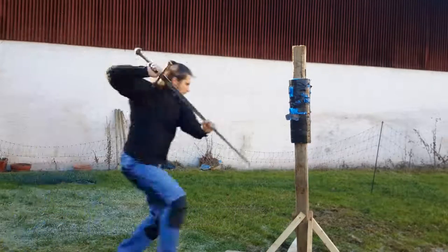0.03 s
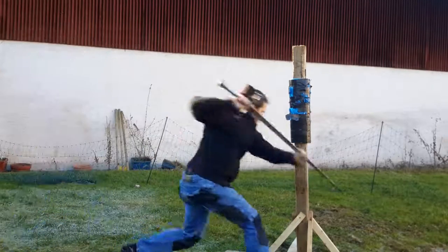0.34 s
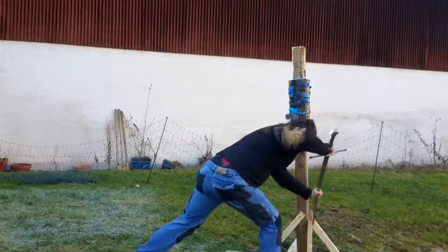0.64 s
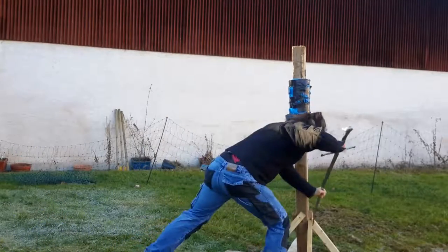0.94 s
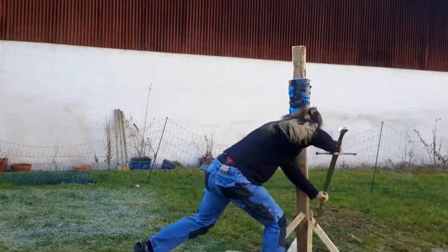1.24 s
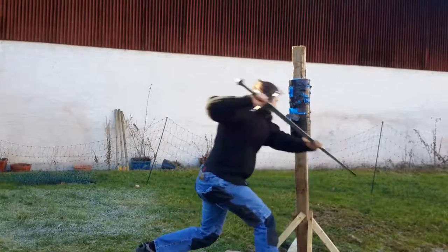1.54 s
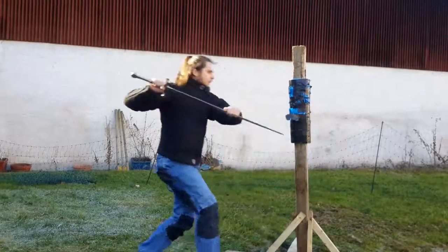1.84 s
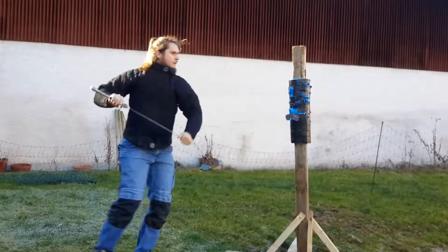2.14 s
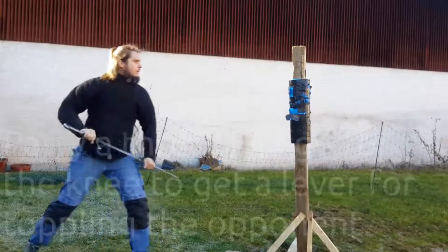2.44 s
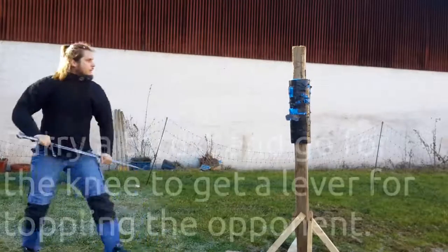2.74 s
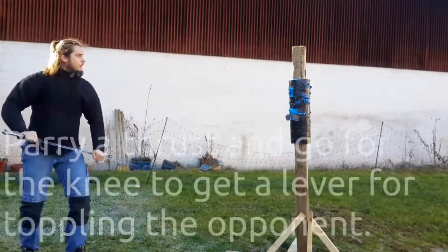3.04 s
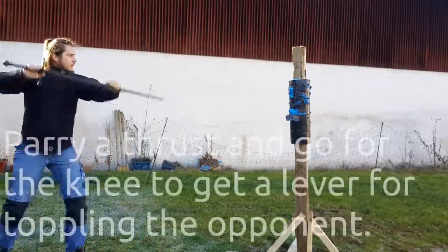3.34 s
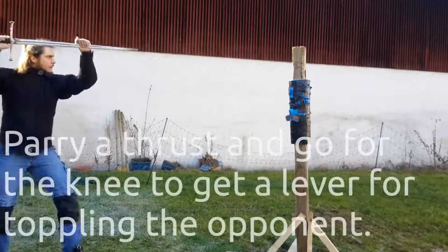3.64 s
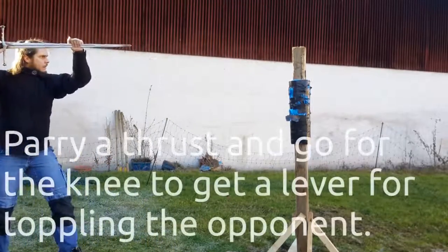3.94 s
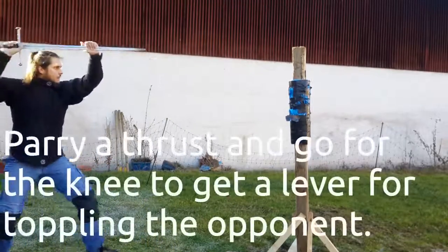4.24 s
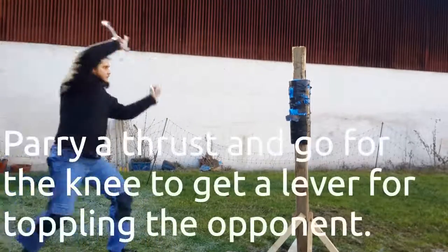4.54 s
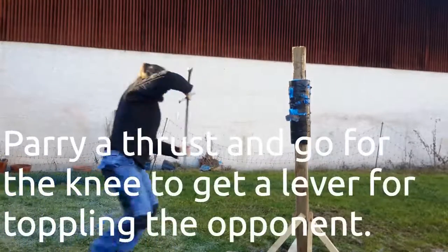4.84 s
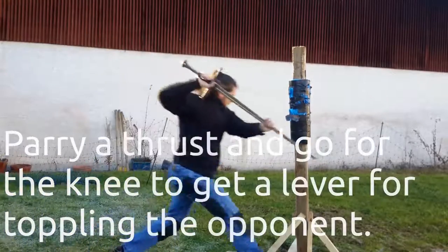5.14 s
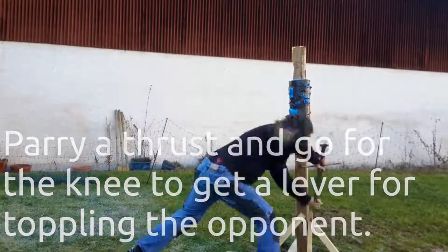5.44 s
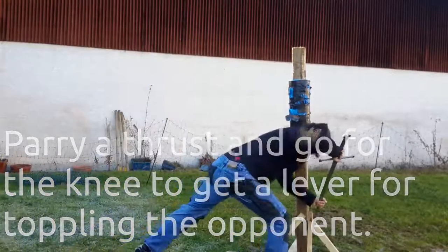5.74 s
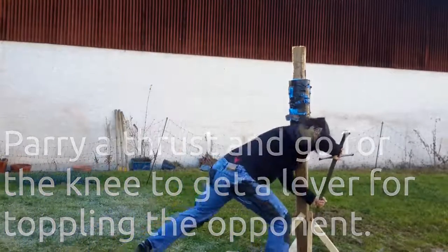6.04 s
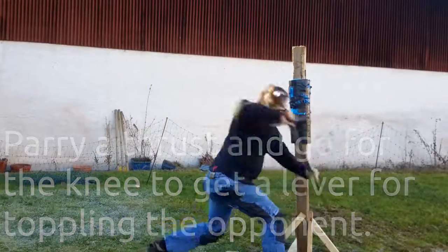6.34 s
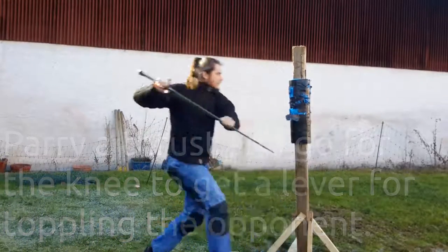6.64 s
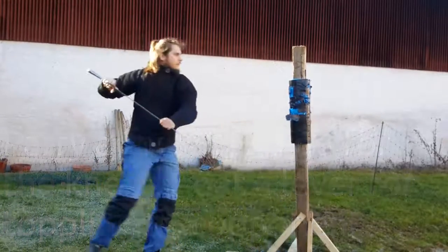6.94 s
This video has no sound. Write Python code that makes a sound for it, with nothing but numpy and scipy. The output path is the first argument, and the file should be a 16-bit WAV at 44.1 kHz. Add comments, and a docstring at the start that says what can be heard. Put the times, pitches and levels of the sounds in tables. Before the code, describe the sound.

On a lawn in a walled yard, a steel sword strikes a wooden post twice, about five seconds apart. Each loud, cracking knock shakes the wooden stand and returns from the buildings as a brief ringing tail. Between the blows the microphone picks up soft footfalls, a little cloth rustle, three faint chirps and two thin whistles from a farther bird. Distant traffic and engines drone very quietly throughout.

```python
"""A steel training sword strikes a wooden post twice on a lawn in a walled yard.
Post and blade ring, fibres crack, the edge skids and the stand shudders. Each knock slaps back
from the wall, then returns from farther buildings as a bright, ringing tail.
Clothes and grass rustle and shoes thud between the blows.
Distant traffic and two engines drone; one small bird chirps, a farther one whistles."""
import sys
import numpy as np
from scipy import signal
from scipy.fft import rfft, irfft, next_fast_len
from scipy.io import wavfile

SR = 44100
rng = np.random.default_rng(int(sys.argv[2]) if len(sys.argv) > 2 else 0)


def output_pcm(signal):
    """Save a mono or channel-first signal as 16-bit PCM at the path in sys.argv[1].

    Samples are clipped to [-1, 1] before scaling.
    """
    pcm = np.clip(np.atleast_2d(signal).T, -1, 1) * 32767
    wavfile.write(sys.argv[1], SR, np.round(pcm).astype(np.int16))


N = 312551
TIME = np.arange(N) / SR
WALL_DELAY_S = .0315

# Spectra of the near scatter, one per blow. Each point: frequency in Hz, density in dB.
NEAR_SPECTRA = [
    [(35, -51), (60, -13), (113, -1), (230, -18.5), (531, 1), (996, -23), (1080, 1), (1230, -3), (1310, -6),
     (2610, -6.5), (2840, -2), (3220, -25), (4700, -8.5), (6570, -21), (9000, -53)],
    [(35, -42), (60, -36), (239, -8), (372, -2), (468, -9), (669, 2), (791, -37), (878, -30), (1020, -11),
     (1950, -1), (2400, -6), (2670, -6), (3650, -7), (4900, -6), (9000, -42.5)],
]
# Spectra of the far returns, one per blow. Each point: frequency in Hz, density in dB.
FAR_SPECTRA = [
    [(200, -14), (436, -4.5), (528, -5), (581, -6), (923, -0.5), (1050, 5.5), (1400, -2.5), (1660, 5),
     (1950, -1.5), (2950, -3), (3200, -13), (4800, -3), (5700, -14), (9000, -45)],
    [(200, -13.5), (554, -3.5), (610, 0), (738, -5), (1190, -3), (1310, -0.5), (1740, 4), (2730, -1.5),
     (4500, 1), (6240, -13), (6540, -22), (8050, -22.5), (9000, -52)],
]


def from_db(db):
    """Decibels to gain."""
    return 10 ** (np.asarray(db) / 20)


def unit_rms(x):
    """Scale to unit power."""
    return x / np.sqrt(np.mean(x ** 2) + 1e-20)


def add(track, start_s, sound):
    """Mix a sound into a track."""
    start = round(start_s * SR)
    track[start:start + len(sound)] += sound[:len(track) - start]


def cut(x, kind, hz, order=2):
    """Causal Butterworth filter."""
    return signal.sosfilt(signal.butter(order, hz, kind, fs=SR, output="sos"), x + 1e-18)


def cut_zero_phase(x, kind, hz, order=2):
    """Butterworth filter run forward and back."""
    return signal.sosfiltfilt(signal.butter(order, hz, kind, fs=SR, output="sos"), x)


def band_noise(size, band_hz, order=2):
    """Unit-power noise in a band."""
    return unit_rms(cut(rng.standard_normal(size), "band", band_hz, order))


def drift(size, rate_hz):
    """Unit-power random wander."""
    return unit_rms(cut(rng.standard_normal(size), "low", rate_hz))


def shaped_noise(spectrum, size, resonances=()):
    """Unit-power noise with a given spectrum plus resonances; falls 30 dB per octave past its ends."""
    padded = next_fast_len(size, real=True)
    hz = np.maximum(np.fft.rfftfreq(padded, 1 / SR), 1)
    points_hz, levels_db = np.transpose(spectrum)
    octaves_outside = np.abs(np.log2(hz / np.clip(hz, points_hz[0], points_hz[-1])))
    db = np.interp(np.log(hz), np.log(points_hz), levels_db) - 30 * octaves_outside
    for centre_hz, width_hz, lift_db in resonances:
        db += lift_db / (1 + (2 * (hz - centre_hz) / width_hz) ** 2)
    white = rfft(rng.standard_normal(padded))
    return unit_rms(irfft(white * from_db(db), padded)[:size])


def decay(age, t60_s, rise_s):
    """Envelope that rises from age 0 and dies exponentially."""
    age = np.maximum(age, 0)
    return (1 - np.exp(-age / rise_s)) * 1000 ** (-age / t60_s)


def burst(envelope, grain):
    """Noise under an envelope, scaled to the envelope's energy."""
    return envelope * grain * np.linalg.norm(envelope) / np.linalg.norm(envelope * grain)


def traffic(split_hz=1400, spreading=1.045, whine_ratio=1.096):
    """Distant road: rumble, roar, tyre hiss and tread whine swell as each vehicle nears."""
    # Vehicles. Each row: nearest moment in seconds, half-width in seconds, roar, rumble and
    # tyre hiss in dB, whine pitch in Hz, whine level in dB.
    passes = [(1.4, 0.55, -59.5, -60, -67, 1180, -67.5), (3.1, 0.62, -57, -58.5, -65.5, 1796, -67.5),
              (4.1, 0.21, -72, -97, -86, 735, -64.5), (4.8, 0.73, -57, -59.5, -65.5, 786, -70),
              (6.95, 1, -64.5, -64.5, -66.5, 760, -76)]
    # Road spectra. Each point: frequency in Hz, density in dB.
    roar_spectrum = [(210, -28.5), (350, -4), (433, -9.5), (647, -1), (942, -2), (1620, -4.5), (1900, -5.5),
                     (2350, -6), (3740, -10.5), (4400, -8.5), (7000, -20), (9100, -62)]
    rumble_spectrum = [(16, -61), (28, -29), (46, -5), (60, -8.5), (92, -2), (215, -4), (254, -5),
                       (453, -9), (600, -9), (780, -19)]
    power = from_db([[-74], [-77.5], [-78]]) ** 2  # steady roar, rumble, tyre hiss
    whine = np.zeros(N)
    for nearest_s, half_width_s, *levels_db, whine_hz, whine_db in passes:
        nearness = (1 + ((TIME - nearest_s) / half_width_s) ** 2) ** -spreading
        power = power + np.outer(from_db(levels_db) ** 2, nearness)
        tread = band_noise(N, [whine_hz / whine_ratio, whine_hz * whine_ratio])
        whine += from_db(whine_db) * np.sqrt(nearness) * tread
    roar_gain, rumble_gain, tyre_gain = np.sqrt(power)
    rumble = rumble_gain * shaped_noise(rumble_spectrum, N)
    roar = roar_gain * unit_rms(cut(shaped_noise(roar_spectrum, N), "low", split_hz, order=4))
    tyres = tyre_gain * unit_rms(cut(shaped_noise(roar_spectrum, N), "high", split_hz, order=4))
    return rumble + roar + tyres + whine


def swells(rows, edge_s):
    """Gain that rises, holds and falls once per row."""
    gain = np.zeros(N)
    for start_s, length_s, db in rows:
        age = TIME - start_s
        gain += from_db(db) * (np.tanh(age / edge_s) - np.tanh((age - length_s) / edge_s)) / 2
    return gain


def hum(hz, wander_hz, throb_db):
    """Low engine note, wavering in pitch and level."""
    pitch_hz = hz + wander_hz * drift(N, rate_hz=9.1)
    throb = from_db(throb_db * drift(N, rate_hz=6.5))
    return throb * unit_rms(np.sin(2 * np.pi * np.cumsum(pitch_hz) / SR))


def engines(idle_hz=69.8, idle_floor_db=-70.5, climb_hz_per_s=9.8):
    """One far engine idles while another gathers speed."""
    # Swells of each engine. Each row: start in seconds, length in seconds, level in dB.
    idle_swells = [(.72, 1.4, -63), (2.35, 1.03, -61.5), (2.7, 0.23, -59)]
    climb_swells = [(4.03, 0.36, -63), (5.2, 0.94, -64)]
    idle_gain = from_db(idle_floor_db) + swells(idle_swells, edge_s=.017)
    idling = idle_gain * hum(idle_hz, wander_hz=4.2, throb_db=1.3)
    climb_hz = 130 + climb_hz_per_s * (TIME - 4.6)
    climbing = swells(climb_swells, edge_s=.071) * hum(climb_hz, wander_hz=3.3, throb_db=3.5)
    return idling + climbing


def movement(step_band_hz=(110, 600), step_t60_s=.28, crumple_db=2, crumple_hz=40):
    """Shoes thud softly on turf; cloth and grass swish."""
    # Footfalls. Each row: start in seconds, level in dB, sole roll-down time in seconds.
    steps = [(0.461, -51.5, 0.0032), (1.9, -36, 0.11), (2.06, -56, 0.006), (2.55, -44, 0.04),
             (4.68, -36, 0.11), (4.73, -53.5, .004), (4.776, -63, .002), (5.33, -52, 0.0041),
             (5.368, -51.5, 0.0023), (6.72, -58, 0.0092)]
    # Swishes. Each row: centre in seconds, level in dB, Gaussian width in seconds.
    rustles = [(0.48, -70.5, 0.088), (1.992, -64, 0.098), (4.73, -69, 0.04), (5.233, -66.5, 0.78),
               (6.78, -75, 0.068)]
    # Cloth and grass spectrum. Each point: frequency in Hz, density in dB.
    rustle_spectrum = [(1500, -6), (3000, -5), (4100, -9), (4500, -5.5), (5100, 1.5), (5600, -2.5),
                       (6400, -28), (8000, -13)]
    weight = sum(from_db(db) * decay(TIME - start_s, step_t60_s, roll_s) for start_s, db, roll_s in steps)
    turf = cut(band_noise(N, step_band_hz, order=1), "low", 1300)
    swish = sum(from_db(db) * np.exp(-((TIME - centre_s) / width_s) ** 2 / 2)
                for centre_s, db, width_s in rustles)
    crumple = from_db(crumple_db * drift(N, crumple_hz))
    return weight * turf + swish * crumple * shaped_noise(rustle_spectrum, N)


def knock(blow, age, lag_s=.00047, travel_1khz_s=.00056, ground_delay_s=.00377, ground_gain=.49):
    """Bending waves run faster at high pitch, so treble modes start first; the ground reflects the knock."""
    # Modes of post and blade, weighted by the contact point. Each row: frequency in Hz,
    # t60 in seconds, level in dB for each blow.
    modes = [(112, .17, -36, -55), (195, .2, -44, -40), (300, .11, -42, -41), (388, .137, -20, -19.5),
             (437, .095, -21.5, -23), (520, .13, -31.5, -25), (665, .099, -21.5, -18.5),
             (773, .053, -29, -29), (973, .06, -17.5, -22.5), (1126, .026, -10.5, -19.5),
             (1270, .028, -14, -10.5), (1437, .022, -24.5, -17), (1686, .015, -23, -12.5),
             (1846, .017, -18, -14.5), (2303, .045, -20, -16), (2490, .05, -32.5, -25),
             (2831, .018, -16, -15), (4277, .009, -17, -4.5), (5530, .05, -38, -35)]
    direct = np.zeros(len(age))
    for k, (hz, t60_s, *levels_db) in enumerate(modes):
        since = age - lag_s - travel_1khz_s * np.sqrt(1000 / hz)
        envelope = from_db(levels_db[blow]) * decay(since, t60_s, rise_s=.00093)
        direct += (-1) ** k * envelope * np.sin(2 * np.pi * hz * since)
    return direct + ground_gain * np.interp(age - ground_delay_s, age, direct, left=0)


def crack(blow, age, t60_s, peak_s=.0028):
    """Wood fibres splinter as the edge bites: a bright burst."""
    # Splinter spectra, one per blow. Each point: frequency in Hz, density in dB.
    spectra = [
        [(2400, 0), (2900, -10), (3340, -11), (3900, -7), (4500, 0), (5700, -1), (6300, -30), (9150, -26),
         (11000, -42)],
        [(2400, 2), (3100, -12), (3650, -5), (4230, -3), (5000, -6), (5650, 0), (6100, -13), (7300, -20),
         (9000, -26), (11000, -65)],
    ]
    bite = np.minimum(age / peak_s, 1) * 1000 ** (-np.maximum(age - peak_s, 0) / t60_s)
    return burst(bite, shaped_noise(spectra[blow], len(age)))


def skid(blow, age, band_hz=(3900, 5600)):
    """The edge skids on the wood and catches again."""
    # Catches. Each row: delay in seconds, level in dB for each blow, t60 in seconds.
    catches = [(0.0132, -28.5, -34, 0.038), (0.0202, -44.5, -30, 0.043)]
    grit = band_noise(len(age), band_hz, order=3)
    return sum(from_db(levels_db[blow]) * burst(decay(age - delay_s, t60_s, rise_s=.0016), grit)
               for delay_s, *levels_db, t60_s in catches)


def stand_rattle(blow, age, band_hz=(330, 1050), delay_s=.0152, buzz_db=-13):
    """The post tips against its wooden stand: hollow clatter with a little bright buzz."""
    hollow = band_noise(len(age), band_hz, order=3)
    buzz = from_db(buzz_db) * shaped_noise(NEAR_SPECTRA[blow], len(age))
    return burst(decay(age - delay_s, t60_s=.26, rise_s=.0024), hollow + buzz)


def sway(age):
    """The shaken post and stand rumble on the ground."""
    return decay(age, t60_s=2.15, rise_s=.19) * band_noise(len(age), band_hz=(56, 135))


def wall_slap(blow, age, clang_hz=1810, clang_t60_s=.018, rise_s=.001):
    """The nearest wall returns the crack with the blade's clang on top."""
    # Wall returns, one per blow. Each row: slap in dB, clang in dB, slap t60 in seconds.
    returns = [(-22.5, -13.5, .026), (-17, -6, .033)]
    # Slap spectrum. Each point: frequency in Hz, density in dB.
    spectrum = [(300, -8), (480, -17), (1000, -16), (1500, 13), (2050, -16), (2500, -7), (2880, 8),
                (3300, -4), (4100, -4), (4650, 4), (5250, 3), (5700, -17), (6500, -24), (9000, -48)]
    slap_db, clang_db, t60_s = returns[blow]
    since = age - WALL_DELAY_S
    slap = burst(decay(since, t60_s, rise_s), shaped_noise(spectrum, len(age)))
    clang = decay(since, clang_t60_s, rise_s) * np.sin(2 * np.pi * clang_hz * since)
    return from_db(slap_db) * slap + from_db(clang_db) * clang


def near_scatter(blow, age):
    """Wall, fence and ground scatter the knock right after the slap."""
    envelope = decay(age - WALL_DELAY_S, t60_s=.22, rise_s=.0017)
    return envelope * shaped_noise(NEAR_SPECTRA[blow], len(age))


def echoes(blow, age, lift_db=8, width_ratio=.47, highpass_hz=950, lowpass_hz=8000):
    """Fence and buildings return the clack, each favouring a band; longer echoes start more softly."""
    # Reflections. Each row: delay in seconds, level in dB for each blow, t60 in seconds,
    # favoured frequency in Hz.
    reflections = [(.0398, -35, -26, .04, 4900), (.047, -33, -28, .02, 2400), (.058, -35, -42, .025, 4500),
                   (.071, -38, -31, .035, 2800), (.128, -42, -39, .07, 4900),
                   (.1419, -24.5, -19, .022, 5000), (.157, -39, -52, .1, 4900),
                   (.1712, -42, -23, .03, 4200), (.1803, -26.5, -19.5, .032, 1450),
                   (.195, -39, -40, .07, 5000), (.216, -35, -42, .04, 1700), (.255, -43, -38, .05, 1800),
                   (.293, -44, -40, .03, 1700), (.335, -40, -37, .07, 2200), (.403, -43, -50, .05, 1600),
                   (.4345, -47, -56, .06, 1600)]
    out = np.zeros(len(age))
    for delay_s, *levels_db, t60_s, hz in reflections:
        grain = shaped_noise(FAR_SPECTRA[blow], len(age), [(hz, width_ratio * hz, lift_db)])
        envelope = decay(age - delay_s, t60_s, rise_s=.022 * t60_s)
        out += from_db(levels_db[blow]) * burst(envelope, cut(grain, "high", highpass_hz))
    return cut(out, "low", lowpass_hz, order=4)


def far_tail(blow, age, crest_s=.17, crest_width_s=.033, crest_db=4):
    """Far echoes arrive in clumps, crest and fade; air takes the treble first, the bass lingers."""
    # Blade resonances. Each row: frequency in Hz, width in Hz, lift in dB for each blow.
    blade = [(1043, 14, 6, 1), (1830, 120, 0, 4), (1890, 62, -8, 5.5), (2580, 72, -9, 3), (2860, 58, 4, 4),
             (3480, 59, -1, 6), (3870, 320, 8.5, -2), (4080, 330, -16, -0.5), (4450, 76, -16, -11),
             (4530, 99, 4, -1)]
    swell_db_per_s, fall_db_per_s, air_db_per_s, linger_db_per_s = 110, 55, 16, 13
    resonances = [(hz, width_hz, lifts_db[blow]) for hz, width_hz, *lifts_db in blade]
    ring = shaped_noise(FAR_SPECTRA[blow], len(age), resonances)
    since_crest = age - crest_s
    early, late = np.maximum(-since_crest, 0), np.maximum(since_crest, 0)
    peak_db = crest_db * (np.exp(-(since_crest / crest_width_s) ** 2) - 1)
    clumps_db = 1.7 * drift(len(age), rate_hz=60)
    envelope = from_db(peak_db + clumps_db - swell_db_per_s * early - fall_db_per_s * late)
    fade_in = np.minimum(2 * age / crest_s, 1)
    dull = cut_zero_phase(ring, "low", 3200)
    bass = cut_zero_phase(ring, "low", 550)
    middle = dull - bass
    treble = (ring - dull) * from_db(-air_db_per_s * since_crest)
    return fade_in * envelope * (bass * from_db(linger_db_per_s * late) + middle + treble)


def sword(length_s=1.5):
    """Two blows on the post, each with the yard's answer."""
    # Blows. Each row: start in seconds, knock and crack in dB, crack t60 in seconds,
    # then stand rattle, sway, near scatter and far tail in dB.
    blows = [(.6594, -0.5, -29, 0.05, -28.5, -49.5, -27, -34.5),
             (5.5627, 0, -21, 0.036, -27, -45.5, -22.5, -29.5)]
    out = np.zeros(N)
    age = np.arange(round(length_s * SR)) / SR
    for blow, row in enumerate(blows):
        start_s, knock_db, crack_db, crack_t60_s, stand_db, sway_db, near_db, far_db = row
        hit = from_db(knock_db) * knock(blow, age)
        edge = from_db(crack_db) * crack(blow, age, crack_t60_s) + skid(blow, age)
        shudder = from_db(stand_db) * stand_rattle(blow, age) + from_db(sway_db) * sway(age)
        returns = wall_slap(blow, age) + echoes(blow, age)
        scatter = from_db(near_db) * near_scatter(blow, age) + from_db(far_db) * far_tail(blow, age)
        add(out, start_s, hit + edge + shudder + returns + scatter)
    return out


def bird_chirps(scoop_s=.019, hook_s=.006, waver_hz=50, rasp_depth=.42, wall_db=-12):
    """Chirps scoop up and hook down, sweeping harmonics through the throat resonance; the wall echoes."""
    # Chirps, pitched at the sixth harmonic. Each row: start and length in seconds,
    # top, opening scoop and closing hook in Hz, level in dB.
    chirps = [(2.587, .038, 5350, 1200, 300, -62), (2.674, .08, 5230, 1450, 750, -58.7),
              (2.882, .097, 5260, 850, 250, -59)]
    throat_hz, throat_width_hz = 5130, 380
    out = np.zeros(N)
    for start_s, length_s, top_hz, scoop_hz, hook_hz, db in chirps:
        age = np.arange(round(length_s * SR)) / SR
        glide_hz = top_hz - scoop_hz * np.exp(-age / scoop_s) - hook_hz * np.exp((age - length_s) / hook_s)
        pitch_hz = (glide_hz + waver_hz * drift(len(age), rate_hz=140)) / 6
        phase = 2 * np.pi * np.cumsum(pitch_hz) / SR
        voice = np.zeros(len(age))
        for k in range(5, 10):
            throat = 1 / np.hypot(1, 2 * (k * pitch_hz - throat_hz) / throat_width_hz)
            rasp = unit_rms(1 + rasp_depth * drift(len(age), rate_hz=400))
            voice += throat * rasp * np.sin(k * phase)
        chirp = from_db(db) * np.sqrt(np.sin(np.pi * age / length_s)) * voice
        add(out, start_s, chirp)
        add(out, start_s + WALL_DELAY_S, from_db(wall_db) * chirp)
    return out


def bird_whistles(waver_hz=20, flutter_db=2.5, rate_hz=50):
    """A farther bird holds thin, level notes with slight flutter."""
    # Notes. Each row: start and length in seconds, pitch in Hz, level in dB.
    notes = [(3.272, .118, 4320, -67.5), (3.555, .04, 4300, -69)]
    out = np.zeros(N)
    for start_s, length_s, hz, db in notes:
        size = round(length_s * SR)
        phase = 2 * np.pi * np.cumsum(hz + waver_hz * drift(size, rate_hz)) / SR
        flutter = unit_rms(from_db(flutter_db * drift(size, rate_hz)))
        add(out, start_s, from_db(db) * signal.windows.tukey(size, .2) * flutter * np.sin(phase))
    return out


def scene():
    """All sources, equal in both channels."""
    mono = sword() + movement() + bird_chirps() + bird_whistles() + traffic() + engines()
    return np.tile(mono, (2, 1))


def suppressor_lift_db(dry, threshold_db=-60, slope=.54, range_db=4.5, release_db_per_s=50):
    """A noise suppressor passes more hiss while the scene is loud, then closes."""
    power = cut(dry[0] ** 2, "low", hz=5, order=1)
    fall_db = release_db_per_s * TIME
    held_db = np.maximum.accumulate(10 * np.log10(power + 1e-12) + fall_db) - fall_db
    return np.clip(slope * (held_db - threshold_db), 0, range_db)


def record(dry, hiss_db=-70, side_treble_db=-6, side_bass_db=-2, width_db=-16, cutoff_hz=14600):
    """The treble is slightly wide between left and right; microphone hiss is added and the top is cut."""
    mid, side = rng.standard_normal((2, N))
    polarity = np.array([[1], [-1]])
    side_treble = from_db(side_treble_db) * cut(side, "high", 4500)
    side_bass = from_db(side_bass_db) * cut(side, "low", 79, order=4)
    hiss = from_db(hiss_db + suppressor_lift_db(dry)) * (mid + polarity * (side_treble + side_bass))
    treble = cut_zero_phase(dry, "high", 4200, order=3)
    treble_width = from_db(width_db) * np.gradient(treble, axis=1) * polarity
    lowpass = signal.ellip(12, .1, 80, cutoff_hz, fs=SR, output="sos")
    return signal.sosfilt(lowpass, dry + treble_width + hiss)


dry = scene()
out = record(dry)
output_pcm(out)
```